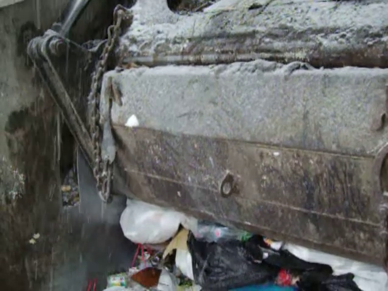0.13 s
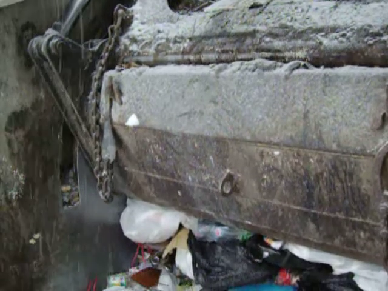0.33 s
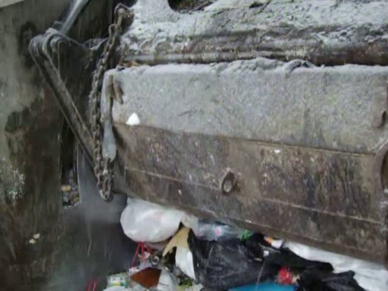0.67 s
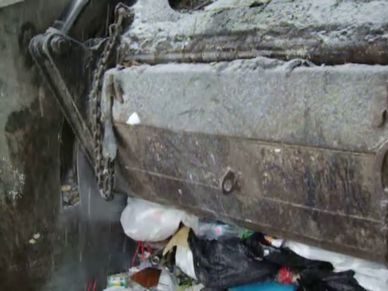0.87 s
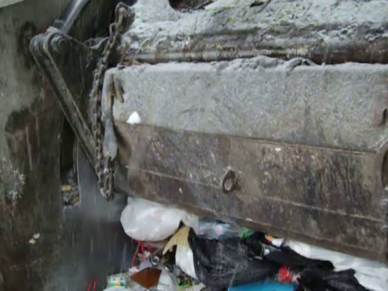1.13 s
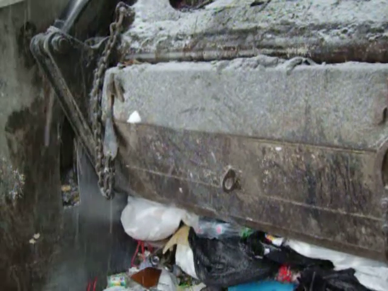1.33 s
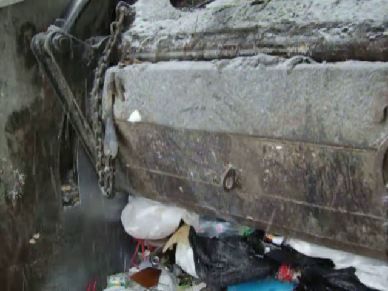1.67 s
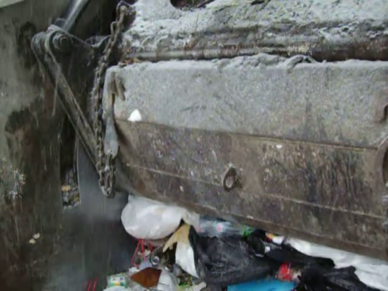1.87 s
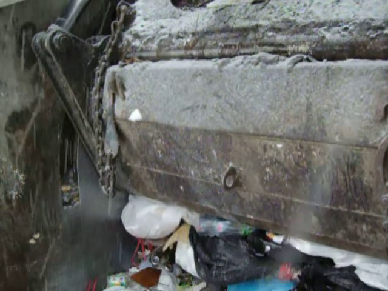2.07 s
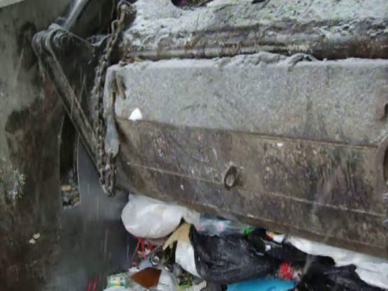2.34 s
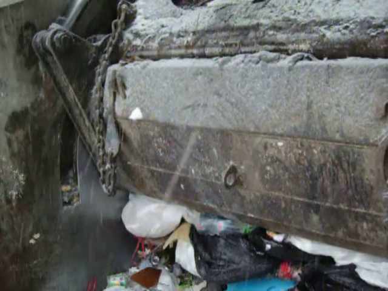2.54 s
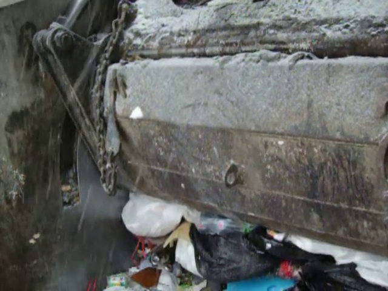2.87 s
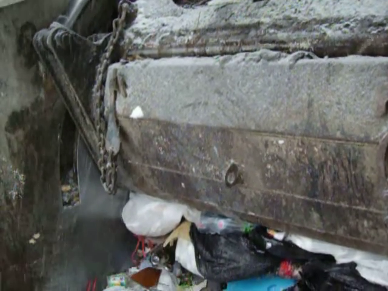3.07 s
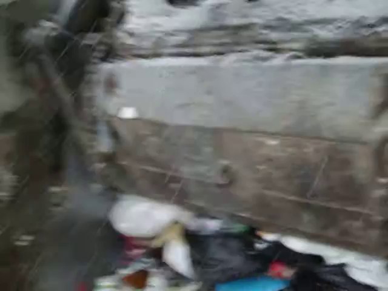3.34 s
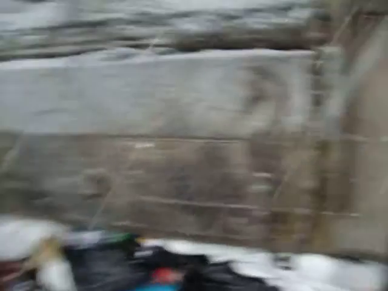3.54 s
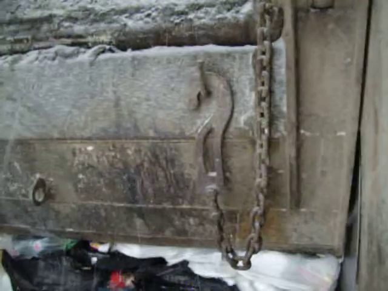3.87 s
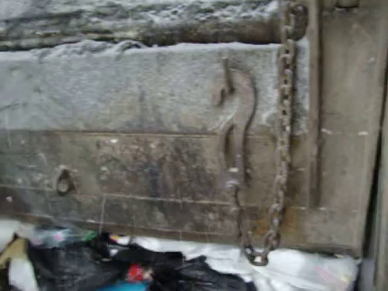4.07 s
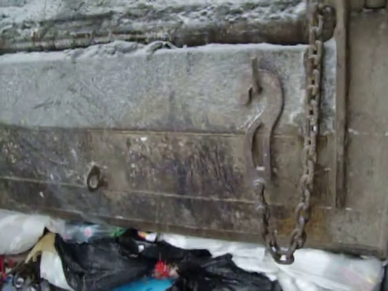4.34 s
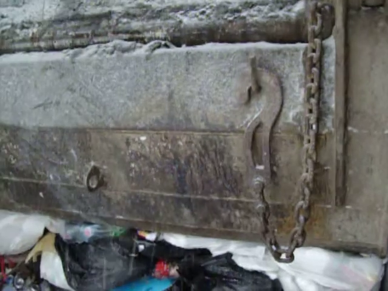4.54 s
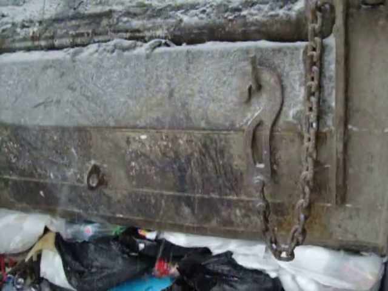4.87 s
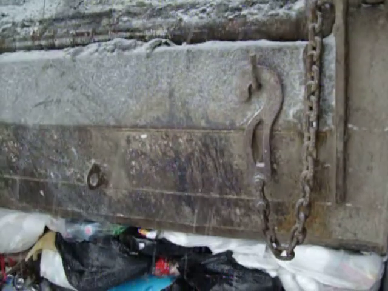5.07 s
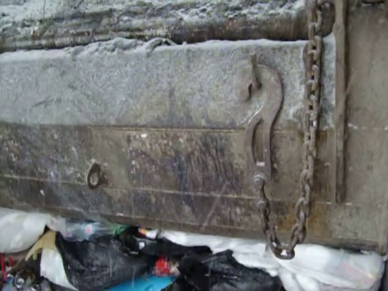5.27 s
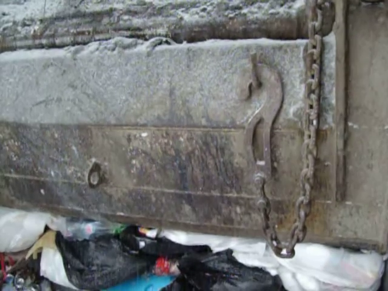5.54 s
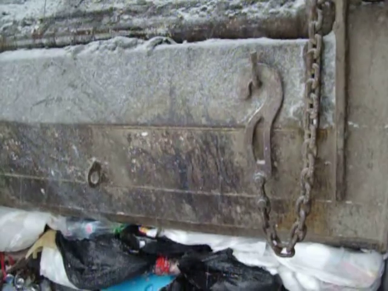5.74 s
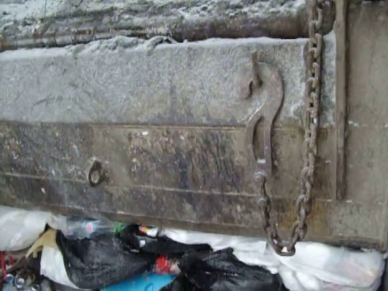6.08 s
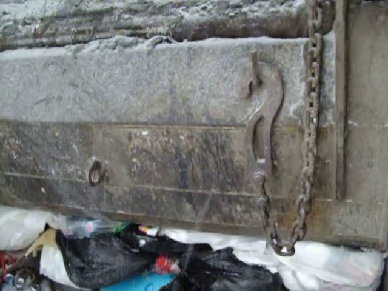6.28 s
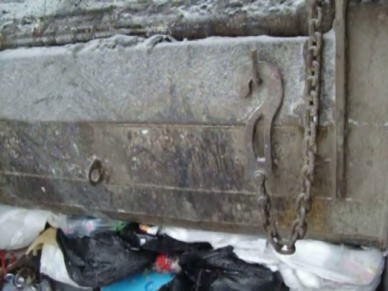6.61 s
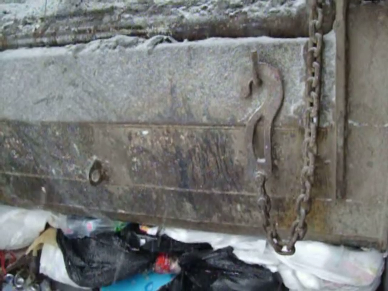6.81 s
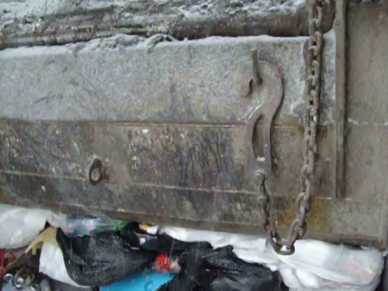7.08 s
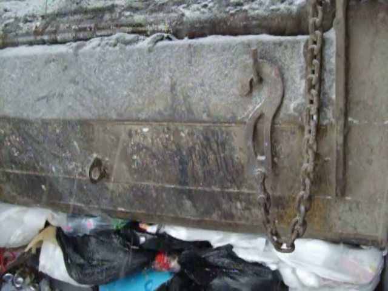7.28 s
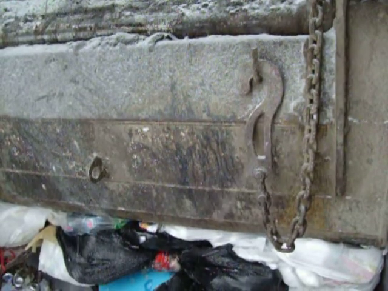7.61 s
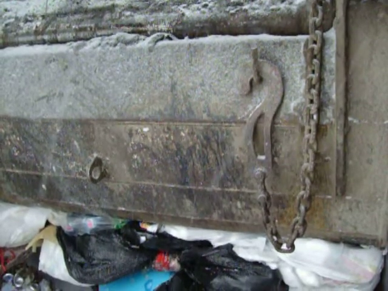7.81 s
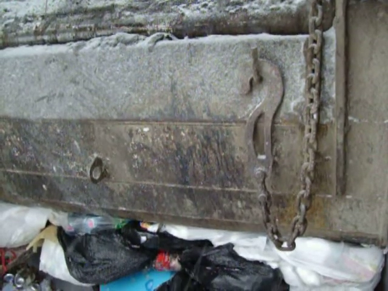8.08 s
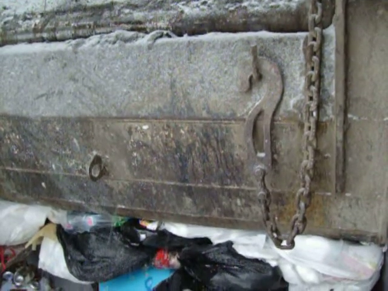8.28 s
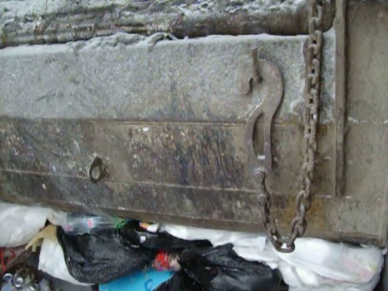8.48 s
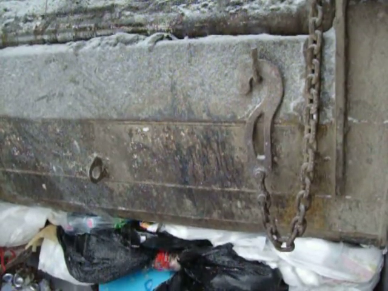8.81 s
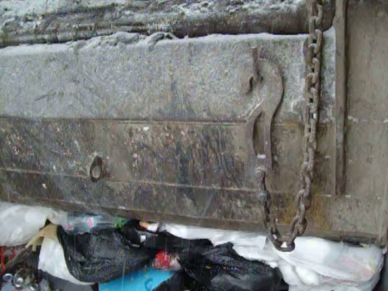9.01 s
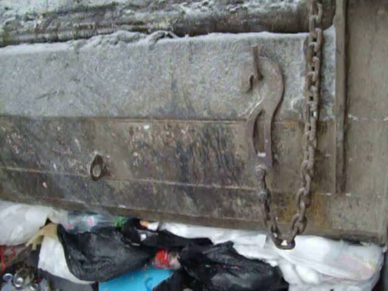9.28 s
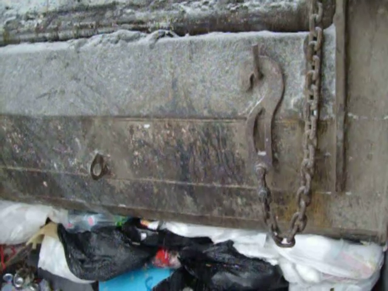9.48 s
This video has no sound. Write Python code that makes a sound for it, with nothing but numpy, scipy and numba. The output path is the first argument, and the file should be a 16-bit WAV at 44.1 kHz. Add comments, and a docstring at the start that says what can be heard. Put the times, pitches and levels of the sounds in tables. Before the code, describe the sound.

Bagged trash bursts, snaps and crinkles under a garbage truck's packing blade while its diesel engine and hydraulic pump drone steadily, with one steel clank.

```python
"""Bagged trash bursts, snaps and crinkles as a garbage truck packs it, heard from just behind the hopper.
Bursts, snaps and the one clank of the blade are volleys of noise through filters; clicks make the crinkle.
A bottle clinks and the steel rings in decaying modes; torn bags hiss and wrappers flick.
Behind them a diesel and its gear pump drone in sine lines; the pump surges at each strain and slowly
grows louder as the load firms up. A gain control ducks the mix at loud cracks and lets it swell back."""
import sys
import numpy as np
from scipy import signal
from scipy.fft import rfft, irfft
from scipy.io import wavfile
from scipy.ndimage import uniform_filter1d
from numba import njit

SR = 44100
rng = np.random.default_rng(int(sys.argv[2]) if len(sys.argv) > 2 else 0)


def waveform_to_disk(signal):
    """Save audio, clipped to [-1, 1], as 16-bit WAV at the path in sys.argv[1]."""
    frames = np.transpose(np.atleast_2d(signal))
    scaled = np.clip(frames, -1, 1) * 32767
    samples = np.round(scaled).astype(np.int16)
    wavfile.write(sys.argv[1], SR, samples)


N = 425124
TIME = np.arange(N) / SR  # s


def undb(db):
    """Decibels to gain."""
    return 10 ** (np.asarray(db) / 20)


def unit(x):
    """Scale to rms 1."""
    return x / np.sqrt(np.mean(x ** 2))


def loudness(x, size=88):
    """Running rms over about two milliseconds."""
    return np.sqrt(np.abs(uniform_filter1d(x ** 2, size)))


def crest(x):
    """Scale a hit so that its loudest moment has rms 1."""
    return x / loudness(x).max()


def add(track, s, x):
    """Mix a sound into a track at a time in seconds."""
    i = max(int(s * SR), 0)
    track[i:i + len(x)] += x[:max(N - i, 0)]


def walk(rate):
    """Slow random wander of rms near 1: levels held for 1 / rate seconds, smoothed twice."""
    hold = int(SR / rate)
    steps = np.repeat(rng.standard_normal(N // hold + 1), hold)
    smooth = uniform_filter1d(uniform_filter1d(steps, hold), hold)
    return unit(smooth[:N])


def swell(s, rise_s, fall_s):
    """A smooth hump of height 1 at a time, down to 1/e after its rise or fall time."""
    return np.exp(-((TIME - s) / np.where(TIME < s, rise_s, fall_s)) ** 2)


def colour(x, points, size=4096):
    """Causal minimum-phase filter through (f/Hz, level/dB) points, built from the cepstrum."""
    hz, db = np.transpose(points)
    f = np.maximum(np.fft.rfftfreq(size, 1 / SR), 1)
    response_db = np.interp(np.log(f), np.log(hz), db)
    cepstrum = irfft(np.log(undb(response_db)))
    # folding the second half onto the first makes the filter causal
    cepstrum[1:size // 2] *= 2
    cepstrum[size // 2 + 1:] = 0
    impulse = irfft(np.exp(rfft(cepstrum)))
    return signal.fftconvolve(x, impulse)[:len(x)]


def resonate(x, hz, q):
    """One resonance, gain 1 at its centre."""
    return signal.lfilter(*signal.iirpeak(hz, q, fs=SR), x)


def grains(rate, spread_db):
    """Random clicks at a mean rate per second, a few much larger than the rest."""
    size = undb(spread_db * np.minimum(rng.exponential(size=N), 5))
    return (rng.random(N) < rate / SR) * size * rng.choice([-1, 1], N)


def fracture(decay_s, echo_db=-19, echo_s=0.027, size=14000):
    """A crack runs: a dense volley of tiny breaks dies away over its scatter between the hopper walls."""
    t = np.arange(size) / SR
    breaks, scatter = rng.standard_normal((2, size))
    return breaks * np.exp(-t / decay_s) + undb(echo_db) * scatter * np.exp(-t / echo_s)


def hopper(clicks, wet_db, decay_s):
    """Every click comes from another place, so each trails its own dense reflections."""
    pole = np.exp(-1 / (decay_s * SR))
    energy = signal.lfilter([1 - pole], [1, -pole], clicks ** 2)
    return clicks + undb(wet_db) * np.sqrt(energy) * rng.standard_normal(N)


def ring(modes, spread, count=2, size=14000):
    """Decaying modes of a struck object; dents and the trash pressed on it detune and split them."""
    t = np.arange(size) / SR
    split = 1 + spread * rng.standard_normal((len(modes), count))
    out = np.zeros(size)
    for (hz, db, t60), cluster in zip(modes, split):
        decay = undb(db - 60 * t / t60)
        for detune in cluster:
            out += decay * np.sin(2 * np.pi * (hz * detune * t + rng.random()))
    return out


TOOTH_HZ, SAG_HZ_PER_S = 101.82, 0.33  # tooth rate at the start, and how it slows
PUMP_DB, PUMP_RISE_DB_PER_S = -18, 0.0366
PUMP_IDLE_DB = -20  # load is counted in dB above this
STRAIN_RISE_S, STRAIN_RELAX_S = 0.12, 0.3
# the blade meets resistance and the engine answers
# (t/s at the height, pump gain level/dB, rise of the tooth rate f/Hz)
RESISTANCE = [(4.98, 1.2, .3), (6.19, .5, 2.5), (7.02, 4.8, 4.5), (7.37, 4.5, .5), (8.2, 2, .2),
              (8.72, 2, .3), (9.14, 1, 4.6), (9.52, 2, 1.8)]


def effort():
    """Tooth rate and pump level: a slow drift as the hopper fills, and a surge at every strain."""
    tooth_hz = TOOTH_HZ - SAG_HZ_PER_S * TIME
    pump_db = PUMP_DB + PUMP_RISE_DB_PER_S * TIME
    for s, gain_db, faster_hz in RESISTANCE:
        surge = swell(s, STRAIN_RISE_S, STRAIN_RELAX_S)
        tooth_hz = tooth_hz + faster_hz * surge
        pump_db = pump_db + gain_db * surge
    return tooth_hz, pump_db


ENGINE_GROWTH = 0.15  # dB gained per dB of pump load
# harmonics of the diesel (multiple of the crank rate, level/dB at zero pump load)
ENGINE_LINES = [(3, -20), (6, -23.5), (15, -31), (26, -27.5), (34, -25.5), (49, -30.5), (59, -29.5)]


def engine(crank, load_db):
    """Six cylinders fire three times a turn; the upper lines waver more."""
    hum = np.zeros(N)
    for multiple, db in ENGINE_LINES:
        line = np.sin(round(multiple) * crank + 2 * np.pi * rng.random())
        waver = 1 + min(0.028 * multiple, .6) * walk(9)
        hum += undb(db) * np.sqrt(2) * line * waver
    return hum * undb(ENGINE_GROWTH * load_db)


PUMP_ROUGH = .14  # random flutter of each pump line
SHAKE_DB, SHAKE_GROWTH = -14, 0.43  # panel rumble at zero load; dB gained per dB of pump load
PANEL_HZ, PANEL_Q, PANEL_DB = 724, 30, -25  # a body panel hums at its own pitch; level at zero load
VALVE_HZ, VALVE_Q, VALVE_DB = 4550, 0.69, -43
# ripple of the oil (multiple of the tooth rate, level/dB above the idle pump,
# dB gained per dB of pump load, dB gained per Hz of tooth rate)
PUMP_LINES = [(1, -16, 1, 1), (2, -.5, 1.3, -.8), (3, 3.5, .75, 1.3), (4, .6, 0, 2)]
# extra gain on the highest pump line (t/s, level/dB)
TOP_LINE_GAIN = [(3.5, 1.5), (4.3, 4.5), (5.9, 4), (6.1, -5), (7, -2)]
# spectrum of the shaken panels (f/Hz, relative level/dB per Hz)
RUMBLE_SPECTRUM = [(20, -7.5), (45, -11), (80, -16.5), (120, -7.5), (170, -6), (300, -2.5), (380, -5.5),
                   (460, -8), (700, -8.5), (1200, -23), (3000, -51)]


def pump(crank, tooth_hz, load_db):
    """Ten gear teeth a turn ripple the oil; firings jog the shaft and shake the panels; the valve hisses."""
    tooth = 10 * crank + 0.091 * np.sin(3 * crank) + 0.035 * walk(22)
    drone = np.zeros(N)
    for multiple, db, per_load, per_hz in PUMP_LINES:
        flutter = 1 + PUMP_ROUGH * (walk(26) + 1j * walk(29)) / np.sqrt(2)
        phase = round(multiple) * tooth + 2 * np.pi * rng.random()
        ripple = (flutter * np.exp(1j * phase)).real
        line_db = PUMP_IDLE_DB + db + per_load * load_db + per_hz * (tooth_hz - TOOTH_HZ)
        if multiple == len(PUMP_LINES):
            line_db = line_db + np.interp(TIME, *np.transpose(TOP_LINE_GAIN))
        drone += undb(line_db) * unit(ripple)
    shake = rng.standard_normal(N) * (1 + 0.17 * np.sin(3 * crank)) * undb(0.93 * walk(10))
    panel = unit(resonate(resonate(shake, PANEL_HZ, PANEL_Q), PANEL_HZ, PANEL_Q))
    body = undb(SHAKE_DB) * unit(colour(shake, RUMBLE_SPECTRUM)) + undb(PANEL_DB) * panel
    valve = undb(VALVE_DB) * unit(resonate(rng.standard_normal(N), VALVE_HZ, VALVE_Q))
    return drone + body * undb(SHAKE_GROWTH * load_db) + valve


# levels at the start, and how they fade as the trash has less left to give
CRUNCH_DB, CRUNCH_FALL_DB_PER_S = -11, 0.57
CRINKLE_DB, CRINKLE_FALL_DB_PER_S = -25.5, 0.47
# bags crumple in a flurry (t/s at the height, crinkle gain level/dB, time to 1/e on either side t/s)
CRUMPLE_FLURRIES = [(0.05, 6.5, 0.6), (1.25, 5.5, 0.04), (1.986, 3.5, 0.27), (3.496, 3, 0.86),
                    (5.548, 2, 0.35), (6.246, 5.5, 0.42), (7.402, 4.5, 0.39), (9.613, 5, 0.11)]


def yielding():
    """Levels of crunch and crinkle: both fade as the load firms up; crumpling bags lift the crinkle."""
    flurries_db = sum(db * swell(s, half_s, half_s) for s, db, half_s in CRUMPLE_FLURRIES)
    crunch_db = CRUNCH_DB - CRUNCH_FALL_DB_PER_S * TIME
    crinkle_db = CRINKLE_DB - CRINKLE_FALL_DB_PER_S * TIME + flurries_db
    return crunch_db, crinkle_db


FITS_DB = 1.7  # depth of each of the two random walks that gather the clicks
# dull crunching inside the load (f/Hz, relative level/dB per Hz)
CRUNCH_SPECTRUM = [(150, -20), (350, 1.5), (520, -1), (760, 1), (1000, -3), (1300, -5.5), (1800, -13),
                   (2600, -19), (5000, -53.5)]
# thin film on top (f/Hz, relative level/dB per Hz)
CRINKLE_SPECTRUM = [(500, -21.5), (1200, 4), (2000, 4.5), (2700, 13), (3400, 6.5), (4200, 7.5), (5600, 0.5),
                    (8000, -24)]


def load(crunch_db, crinkle_db):
    """The load gives way in fits: dull crunching inside, thin film crinkling on top."""
    fits = walk(30)  # shared by both layers
    crunch_clicks = grains(rate=900, spread_db=1.5) * undb(FITS_DB * (fits + walk(60)))
    crunch = hopper(crunch_clicks, wet_db=0.5, decay_s=0.0032)
    crinkle_clicks = grains(rate=1100, spread_db=4.0) * undb(FITS_DB * (fits + walk(55)))
    crinkle = hopper(crinkle_clicks, wet_db=3.5, decay_s=0.0055)
    dull = unit(colour(crunch, CRUNCH_SPECTRUM)) * undb(crunch_db)
    bright = unit(colour(crinkle, CRINKLE_SPECTRUM)) * undb(crinkle_db)
    return dull + bright


# level at 1 kHz, its slope with pitch, how far a few stand out
CRACKLE_DB, CRACKLE_DB_PER_OCTAVE, CRACKLE_SCATTER_DB = -16, -2.3, 2.2
CRACKLE_LOW_HZ, CRACKLE_HIGH_HZ, CRACKLE_Q, CRACKLE_DECAY_S = 615, 5040, 4, .0016


def crackles(count=300):
    """Bits of packaging crack one by one, each at its own pitch; smaller ones are higher, mostly fainter."""
    out = np.zeros(N)
    for when, small, chance in rng.random((count, 3)):
        hz = CRACKLE_LOW_HZ * (CRACKLE_HIGH_HZ / CRACKLE_LOW_HZ) ** small
        stand_out_db = CRACKLE_SCATTER_DB * min(-np.log(1 - chance), 2)
        db = CRACKLE_DB + CRACKLE_DB_PER_OCTAVE * np.log2(hz / 1000) + stand_out_db
        crack = resonate(fracture(CRACKLE_DECAY_S, size=3000), hz, CRACKLE_Q)
        add(out, when * N / SR, undb(db) * crest(crack))
    return out


FLICK_HZ, FLICK_DECAY_S = 5250, 0.0046
# stiff wrappers flicking over (t/s, level/dB)
WRAPPER_FLICKS = [(2.846, -17.5), (3.145, -13), (4.115, -17), (8.493, -17), (9.509, -9.5)]


def ticks():
    """Stiff wrappers flip over in single bright flicks."""
    out = np.zeros(N)
    for s, db in WRAPPER_FLICKS:
        flick = resonate(resonate(fracture(FLICK_DECAY_S), FLICK_HZ, 3), FLICK_HZ, 3)
        add(out, s, undb(db) * crest(flick))
    return out


# air squeezed out of bags (t/s at the height, level/dB before flutter, time to 1/e on either side t/s)
AIR_JETS = [(6.587, -20.5, 0.14), (8.12, -22, 0.078)]


def air():
    """A squeezed bag hisses through a tear, swelling and fading."""
    jet = resonate(resonate(rng.standard_normal(N), 2600, 2.8), 2600, 1.9)
    flow = sum(undb(db) * swell(s, half_s, half_s) for s, db, half_s in AIR_JETS)
    flutter = undb(2.7 * walk(40))
    return unit(jet) * flow * flutter


# a bottle knocked (t/s, level/dB of the ring, brightness tilt in dB per octave above the lowest mode)
BOTTLE_CLINKS = [(0.679, -3, -3), (2.917, -9.5, -4), (6.829, -6, -2.5), (8.924, -4, 7)]
# modes of the glass (f/Hz, relative level/dB before the tilt, time to fall 60 dB t/s)
BOTTLE_MODES = [(1895, -8, .08), (2030, 0, .085), (2245, -3, .06), (2552, -9, .05), (2961, -11, .055),
                (3587, -9, .075), (4235, -20, .04)]


def bottle():
    """A short contact tick and the quickly muffled ring of the glass; a harder contact rings brighter."""
    out = np.zeros(N)
    lowest_hz = BOTTLE_MODES[0][0]
    for s, db, bright_db in BOTTLE_CLINKS:
        modes = [(hz, mode_db + bright_db * np.log2(hz / lowest_hz), t60)
                 for hz, mode_db, t60 in BOTTLE_MODES]
        tick = crest(colour(fracture(decay_s=.005), SNAP_SPECTRUM))
        glass = crest(ring(modes, spread=.007))
        add(out, s, undb(db) * (glass + undb(-6) * tick))
    return out


# hard plastic snapping (t/s, crack level/dB, splinter level/dB relative to the crack, crack decay t/s)
PLASTIC_SNAPS = [(0.351, 2, 11, 0.012), (0.678, 2, 10.5, 0.03), (1.275, -1.5, 15, 0.02),
                 (1.405, 5.5, 2.5, 0.0061), (1.51, -2.5, 12, 0.02), (1.78, -1, 5.5, 0.022),
                 (1.853, 1, 16, .01), (2.456, -5, 7.5, 0.0092), (2.65, -5, 9.5, 0.02),
                 (2.79, -3.5, -8, 0.018), (2.947, -7.5, -1, 0.0065), (2.988, -4.5, -6, 0.015),
                 (3.074, -6, -4, 0.023), (3.189, -6, 3, 0.0079), (3.371, -4, -1, 0.014),
                 (3.917, -4, 7, 0.0087), (4.373, -6, 2, 0.023), (4.637, -1, 8, 0.011),
                 (4.814, -5, -1, 0.038), (4.85, -1.5, 2, 0.028), (6.024, 0, 3, 0.021),
                 (6.339, -3.5, 8, 0.007), (7.972, -7.5, 13.5, 0.0083), (8.258, -.5, 0.5, 0.01),
                 (8.677, -11, -1, 0.008), (8.829, -13, -1, 0.0057), (9.313, -2.5, -9, 0.0094)]
# dry crack, also in the bottle's tick and the bursts (f/Hz, relative level/dB per Hz)
SNAP_SPECTRUM = [(200, 4), (600, 9.5), (1100, 2), (1900, -0.5), (3000, -2), (4200, -13), (5400, -20.5),
                 (8000, -41), (15000, -5.5)]
# bright splintering top end, also in the clank (f/Hz, relative level/dB per Hz)
SPLINTER_SPECTRUM = [(2000, -35), (4200, -11), (6000, -18), (8000, 15.5), (18000, -14.5)]


def snaps():
    """Brittle plastic breaks with a dry crack and a bright splinter."""
    out = np.zeros(N)
    for s, db, splinter_db, decay_s in PLASTIC_SNAPS:
        crack = crest(colour(fracture(decay_s), SNAP_SPECTRUM))
        splinter = crest(colour(fracture(decay_s=0.0061), SPLINTER_SPECTRUM))
        add(out, s, undb(db) * (crack + undb(splinter_db) * splinter))
    return out


# the steel blade slips once; jolt and ring levels are those before the build-up
CLANK_S, CLANK_DB, CLANK_ATTACK_S, CLANK_DECAY_S = 3.763, 17, 0.002, 0.018
CLANK_RING_DB, CLANK_SPLINTER_DB = 2, 13
# spectrum of the jolt (f/Hz, relative level/dB per Hz)
CLANK_SPECTRUM = [(300, 2), (900, 5), (2000, 2.5), (3200, 7.5), (4300, -13), (5500, -27), (9000, -16)]
# modes of the blade (f/Hz, relative level/dB, time to fall 60 dB t/s)
STEEL_MODES = [(931, -4, .4), (1798, -4, .35), (2320, -6, .35), (2900, -1, .3), (3311, 1, .22),
               (3671, -4, .35), (4350, -9, .3)]


def clank():
    """Something hard gives way under the blade: a sharp splinter, a rough jolt, then the steel rings on."""
    out = np.zeros(N)
    splinter = crest(colour(fracture(decay_s=0.02), SPLINTER_SPECTRUM))
    add(out, CLANK_S, undb(CLANK_SPLINTER_DB) * splinter)
    rough = fracture(CLANK_DECAY_S, echo_db=-15, echo_s=0.042)
    jolt = undb(CLANK_DB) * crest(colour(rough, CLANK_SPECTRUM))
    steel = undb(CLANK_RING_DB) * crest(ring(STEEL_MODES, spread=.03, count=4))
    build_up = 1 - np.exp(-np.arange(len(jolt)) / SR / CLANK_ATTACK_S)
    add(out, CLANK_S, (jolt + steel) * build_up)
    return out


HOLLOW_Q, HOLLOW_ECHO_DB = 3.2, -9.5  # sharpness of a burst's resonance; its scatter off the hopper walls
# bags and boxes bursting (t/s, level/dB, body resonance f/Hz, decay of the tear t/s)
BAG_BURSTS = [(0.102, 15.5, 786, 0.006), (0.215, 3.5, 940, 0.0017), (0.301, 6, 816, 0.019),
              (0.599, 1, 810, 0.0048), (0.634, -5, 710, 0.01), (0.677, 5.5, 970, 0.049),
              (1.513, 4.5, 1030, 0.011), (1.704, 0.5, 950, 0.014), (1.782, -3, 780, 0.0087),
              (1.943, 5, 950, 0.011), (2.336, 0.5, 735, 0.022), (2.396, 2.5, 760, 0.005),
              (2.425, -2.5, 790, 0.006), (2.652, 3.5, 880, 0.0058), (3.162, -1, 940, 0.013),
              (3.263, 2, 696, 0.013), (3.431, -3, 1070, 0.038), (3.677, 1.5, 970, 0.072),
              (3.705, 7, 740, 0.013), (3.986, 1.5, 930, 0.0086), (4.054, -1.5, 580, 0.0051),
              (4.255, 1, 560, 0.0033), (4.534, 0.5, 550, .006), (5.26, -7, 910, 0.044),
              (5.308, 6.5, 540, 0.0057), (5.471, -2.5, 920, 0.018), (5.514, -1, 900, 0.012),
              (5.545, -2, 910, 0.017), (5.687, 8.5, 720, 0.02), (5.872, 0.5, 590, 0.035),
              (6.028, 7, 970, 0.023), (6.177, 2, 274, 0.0065), (6.891, -4.5, 790, .0066),
              (7.307, -5, 930, 0.011), (7.438, -5.5, 746, 0.018), (7.742, 12.5, 720, 0.024),
              (8.258, 2, 704, 0.0027), (8.674, -3.5, 710, 0.005), (8.868, 3.5, 810, 0.026),
              (8.927, 1.5, 696, 0.017), (9.053, 1.5, 545, 0.0057), (9.14, -1.5, 566, 0.01),
              (9.312, 1, 740, 0.02)]


def bursts():
    """Each bag or box tears open and rings its own hollow."""
    out = np.zeros(N)
    for s, db, hz, decay_s in BAG_BURSTS:
        tear = fracture(decay_s, echo_db=HOLLOW_ECHO_DB)
        hollow = resonate(resonate(tear, hz, HOLLOW_Q), 0.8 * hz, 1.05)
        edge = crest(colour(tear, SNAP_SPECTRUM))
        add(out, s, undb(db) * crest(crest(hollow) + undb(-7.5) * edge))
    return out


def scene():
    """The engine drives the pump, the pump drives the blade into the load."""
    tooth_hz, pump_db = effort()
    load_db = pump_db - PUMP_IDLE_DB
    crank = 2 * np.pi * np.cumsum(tooth_hz / 10) / SR  # radians
    trash = load(*yielding()) + crackles() + ticks() + air() + bursts() + snaps() + clank() + bottle()
    machine = engine(crank, load_db) + pump(crank, tooth_hz, load_db)
    return (machine + trash)[None]


@njit
def follow(over, start, release):
    """Jumps to each peak, then sinks back towards the present level."""
    held, e = np.empty(len(over)), start
    for i in range(len(over)):
        e = max(over[i], e + (over[i] - e) * release)
        held[i] = e
    return held


def gain_control(x, knee_db, start_db, attack_s, release_s):
    """Turns the sound down quickly by what it exceeds the knee, and recovers slowly."""
    over = np.maximum(loudness(x) / undb(knee_db), 1)
    gain = 1 / follow(over, float(undb(start_db)), 1 / (release_s * SR))
    pole = np.exp(-1 / (attack_s * SR))
    # smoothing starts from the first gain, so there is no fade-in from silence
    smooth_gain = gain[0] + signal.lfilter([1 - pole], [1, -pole], gain - gain[0])
    return x * smooth_gain


BAND_HZ, TOP_HZ = 5800, 15800  # low-pass corners before and after clipping


def record(dry):
    """Gain control, a steep low-pass, soft clipping of the overshoots and a last low-pass."""
    ridden = undb(-2.5) * gain_control(dry[0], knee_db=-3.5, start_db=17.0, attack_s=.0019, release_s=0.2)
    narrow = signal.sosfilt(signal.cheby1(14, .3, BAND_HZ, fs=SR, output="sos"), ridden)
    clipped = narrow / (1 + (narrow / .74) ** 10) ** (1 / 10)  # bends over near a ceiling of 0.74
    return signal.sosfilt(signal.ellip(8, .2, 70, TOP_HZ, fs=SR, output="sos"), clipped)[None]


dry = scene()
out = record(dry)
waveform_to_disk(out)
```